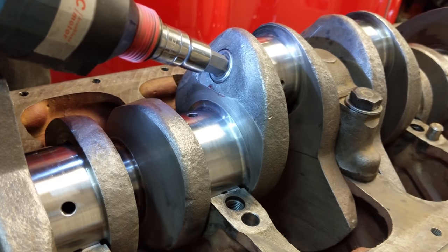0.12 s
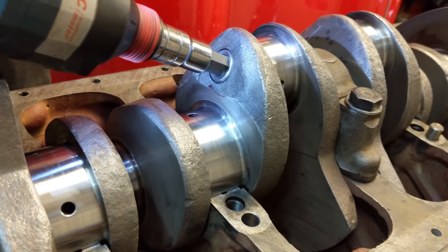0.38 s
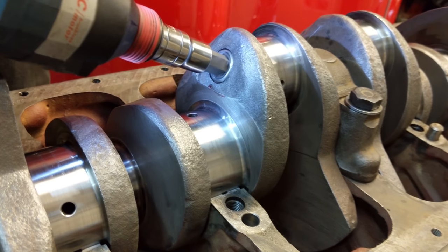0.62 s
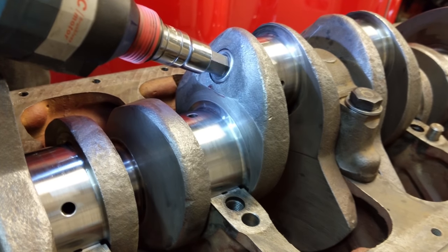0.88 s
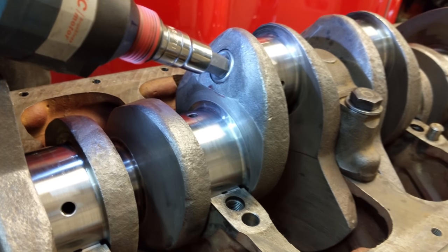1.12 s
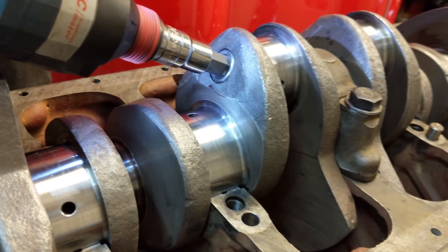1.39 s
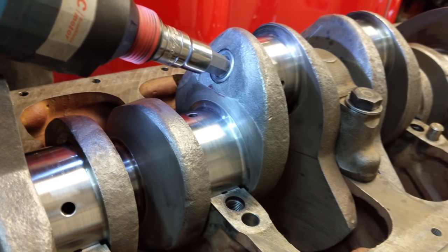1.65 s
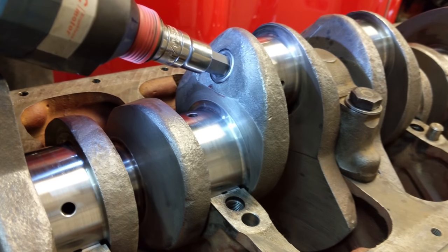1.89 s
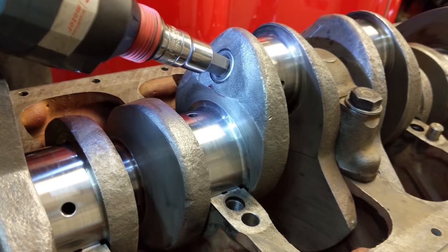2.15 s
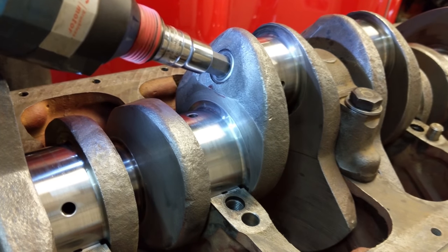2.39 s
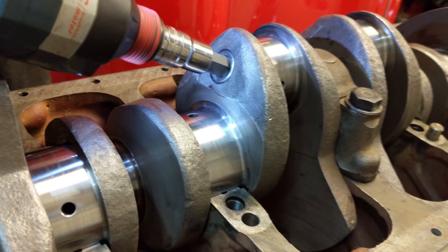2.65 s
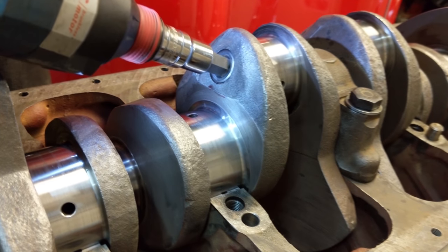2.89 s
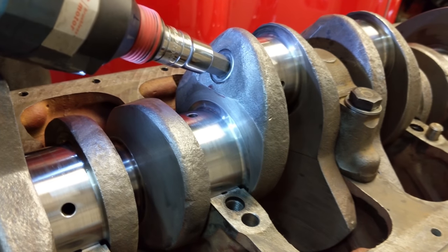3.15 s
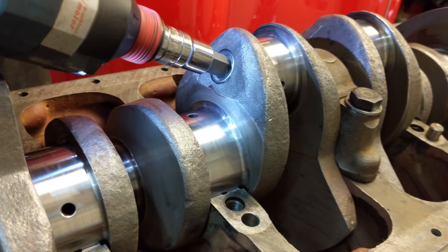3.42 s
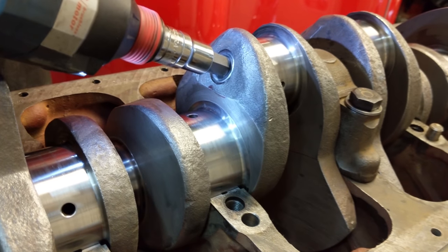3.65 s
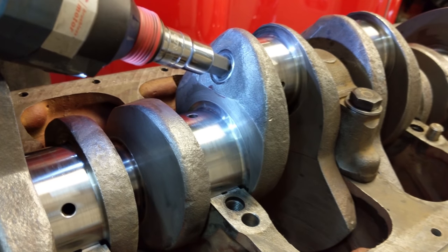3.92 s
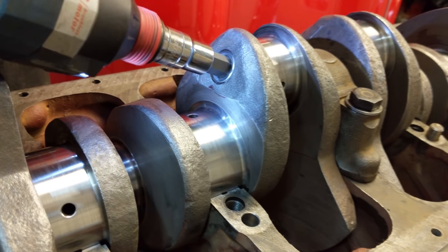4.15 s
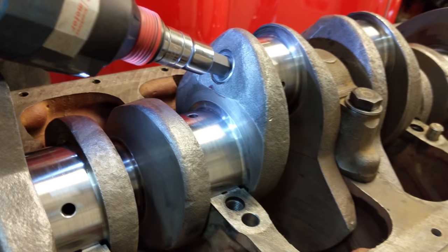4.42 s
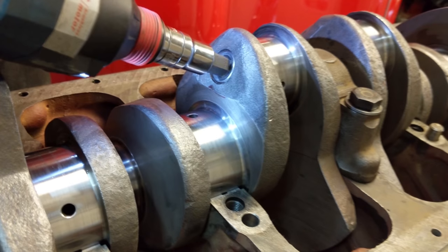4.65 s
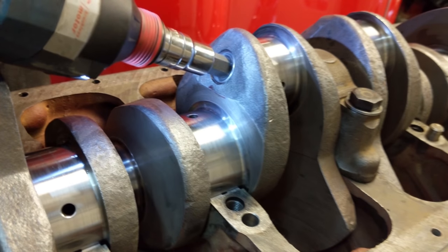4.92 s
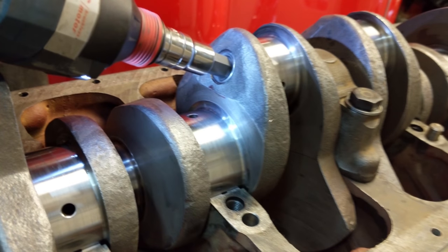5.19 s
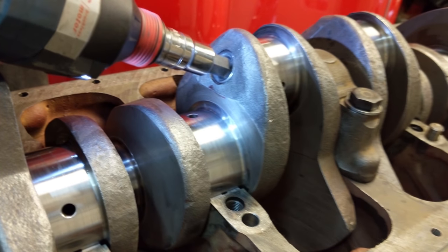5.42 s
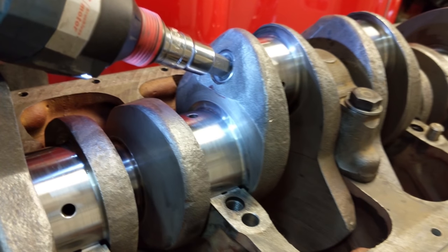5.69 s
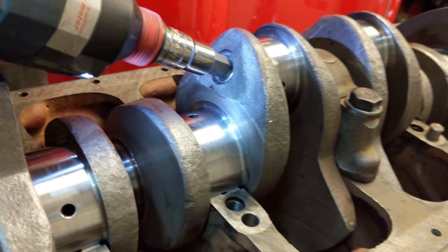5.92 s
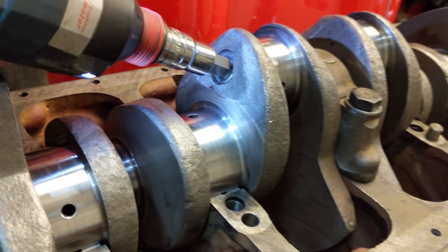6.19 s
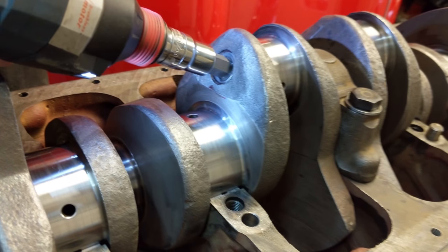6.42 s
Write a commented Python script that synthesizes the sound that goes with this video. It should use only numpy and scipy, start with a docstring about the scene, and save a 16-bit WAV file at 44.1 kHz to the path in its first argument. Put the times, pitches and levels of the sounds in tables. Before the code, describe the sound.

Fast, hard rattling of an impact tool against heavy metal, about twenty-seven blows a second, never pausing, with a thin high steel ring growing stronger.

```python
"""Impact driver on a crankshaft plug

An impact driver hammers a plug into a steel crankshaft, close by in a workshop.
Each cycle the hammer strikes the anvil, rebounds onto it some 8 ms later, rattles, and the cam ticks as it lifts.
Contacts are noise bursts; anvil, bit, shaft and housing are dying sines, many at new strengths on every blow.
Shaped noise whirrs underneath as motor and gears, and a short noise tail answers from the room."""
import sys
import numpy as np
from scipy import signal
from scipy.fft import rfft, irfft, next_fast_len
from scipy.io import wavfile
from scipy.ndimage import uniform_filter1d

SR = 44100
rng = np.random.default_rng(int(sys.argv[2]) if len(sys.argv) > 2 else 0)


def ratio_of_db(decibels):
    """Turn decibels (scalar or array-like) into linear amplitude factors; 0 dB maps to 1."""
    return 10 ** (np.asarray(decibels, float) / 20)


def persist_wave(psi):
    """Save psi, clipped to +-1, as 16-bit WAV."""
    counts = np.round(np.clip(psi, -1, 1) * 32767).astype(np.int16)
    wavfile.write(sys.argv[1], SR, np.atleast_2d(counts).T)


N = 289279
T = np.arange(SR // 10) / SR  # s, the time axis of one hit

# Levels in the tables are relative: each layer adds its own trim where it is played.


def unit(x):
    """Each row to rms 1."""
    return x / np.sqrt(np.mean(x ** 2, axis=-1, keepdims=True) + 1e-20)


def along(points, hz):
    """Read (Hz, value) points on a log frequency axis."""
    f, v = np.transpose(points)
    return np.interp(np.log(hz + 1), np.log(f + 1), v)


def read(table, s):
    """The columns of a curve table at times s."""
    when, *columns = np.transpose(table)
    return np.array([np.interp(s, when, column) for column in columns])


def filtered(x, response):
    """Rows of x times a response of frequency."""
    m = next_fast_len(x.shape[-1] + 2048)
    spectrum = rfft(x, m) * response(np.fft.rfftfreq(m, 1 / SR))
    return irfft(spectrum, m)[..., :x.shape[-1]]


def placed(seconds, rows):
    """Sum of the rows, each starting at its time."""
    start = np.round(np.asarray(seconds) * SR).astype(int)
    at = start[:, None] + np.arange(rows.shape[1])
    ok = (at >= 0) & (at < N)
    return np.bincount(at[ok], rows[ok], N)


def dying(t60, attack):
    """Envelope of a hit: exponential rise (time constant attack, s) and 60 dB decay in t60 s."""
    return ratio_of_db(-60 * T / t60) * (1 - np.exp(-T / attack))


def same_lug_blend(x):
    """Add the rows two and four hits back, so that hits on the same lug resemble each other."""
    return x + np.roll(x, 2, axis=0) + np.roll(x, 4, axis=0)


def nearest(s, moments):
    """Index of the event closest to each moment."""
    return np.abs(s[:, None] - moments).argmin(axis=0)


# decay of the workshop's answer: (frequency [Hz], t60 [s])
ROOM_DECAY = [(200, 0.44), (2000, 0.086), (10000, 0.046)]


def workshop(x):
    """Room answer 5 ms late: a noise tail in which each frequency dies at its own speed."""
    hz, t, z = signal.stft(rng.standard_normal(SR // 4), SR, nperseg=256)
    decay = ratio_of_db(-60 * t / along(ROOM_DECAY, hz)[:, None])
    tail = signal.istft(z * decay, SR, nperseg=256)[1]
    late = np.pad(x, (SR // 200, 0))
    return signal.fftconvolve(late, tail / np.linalg.norm(tail))[:N]


# colour of motor and gears: (frequency [Hz], level [dB per Hz, relative])
WHIRR_COLOUR = [(30, -27), (55, -9), (120, -1), (280, -9.5), (420, -16), (550, -2.5), (1200, -3.5),
                (1700, -3.5), (2450, -1.5), (2900, -0.5), (5000, -3), (8000, 0.5), (10000, -7),
                (12000, -29), (17000, -47)]


def motor():
    """Steady gear and fan noise, made slightly patchy in time and frequency."""
    z = signal.stft(rng.standard_normal(N + SR // 10), nperseg=256)[2]
    patches = uniform_filter1d(rng.standard_normal(z.shape), size=3, axis=0)
    patches = uniform_filter1d(patches, size=4, axis=1)
    patch_gain = ratio_of_db(2 * patches / patches.std())
    noise = signal.istft(z * patch_gain, nperseg=256)[1][:N]
    return ratio_of_db(-52.0) * unit(filtered(noise, lambda f: ratio_of_db(along(WHIRR_COLOUR, f))))


# colour of steel contacts: (frequency [Hz], level [dB, relative])
CONTACT_COLOUR = [(150, -15.5), (500, -15.5), (1500, -9.5), (3000, -5), (5500, -4), (8000, 3), (9600, 6),
                  (10300, -5.5), (12000, -7), (14200, -5), (15500, -8), (17000, -49)]


def cracks(db, t60, top_hz):
    """Noise bursts of steel contact, alike on the same lug; a lower top_hz makes them duller."""
    def colour(f):
        return ratio_of_db(along(CONTACT_COLOUR, f)) / (1 + (f / top_hz) ** 4)
    fresh = rng.standard_normal((len(db), len(T)))
    # many tiny contacts, not an even hiss
    flicker = uniform_filter1d(np.roll(fresh, 1, axis=0), size=30, axis=1)
    grit = ratio_of_db(3.1 * unit(flicker))
    burst = unit(filtered(same_lug_blend(fresh) * grit, colour))
    return ratio_of_db(db)[:, None] * burst * dying(t60, attack=0.00015)


# two housing modes that beat: (frequency [Hz], level [dB, relative], t60 [s])
HOUSING_MODES = [(1140, 3, 0.011), (1335, 1.5, 0.016)]


def knock():
    """The two housing modes start opposed, so the knock swells and then cancels itself."""
    out = 0
    for sign, (hz, db, t60) in zip((-1, 1), HOUSING_MODES):
        out = out + sign * ratio_of_db(db - 60 * T / t60) * np.cos(2 * np.pi * hz * T)
    return out


def housing(blow, rebound):
    """Body knocks at blow, rebound and cam lift; low dying sines kick it, sway it and push it again."""
    s, _, knock_db, kick_db, sway_db, _ = blow
    again = rebound[0]
    chance = rng.standard_normal((len(s), 3))
    hollow = np.sin(2 * np.pi * 660 * T) * dying(0.023, attack=0.0012)
    out = placed(s + 0.00031, ratio_of_db(knock_db + 5.5)[:, None] * knock() + ratio_of_db(-42.5) * hollow)

    hum = np.sin(2 * np.pi * 348 * T) * dying(0.044, attack=0.0015)
    hum_db = -59.5 + 1.3 * again  # hums more as the plug tightens
    out += placed(again, ratio_of_db(hum_db)[:, None] * hum)
    out += placed(again, ratio_of_db(-47.5 + 2 * chance[:, :1]) * knock())

    cam_knock = ratio_of_db(-51.5 + 2 * chance[:, 1:2]) * knock()
    cam_tick = cracks(-52 + 2 * chance[:, 1], t60=0.011, top_hz=3480)
    out += placed(s + .0293, cam_knock + cam_tick)

    kick = -np.sin(2 * np.pi * 360 * T) * dying(0.0069, attack=0.00032)
    out += placed(s - .0002, ratio_of_db(kick_db + 12)[:, None] * kick)
    out += placed(again, ratio_of_db(-41.5 + 4.0 * chance[:, 2:]) * kick)

    # a harder shove moves more of the hand and sways slower
    sway_hz = 94 - 4.2 * (sway_db[:, None] + 58)
    sway = np.cos(2 * np.pi * sway_hz * T) * dying(0.029, attack=0.00022)
    out += placed(s + 0.0014, ratio_of_db(sway_db + 10.0)[:, None] * sway)

    # the spring loads up to the rebound and lets go
    push = -np.sin(2 * np.pi * 105 * T) * dying(0.048, attack=0.0015)
    out += placed(again - .004, ratio_of_db(-59.0 + 2 * chance[:, 2:]) * push)
    return filtered(out, lambda f: 1 / (1 + (44 / (f + 1)) ** 6))  # rumble below 44 Hz is cut


# loose parts touching after a blow, before the bit colours them:
# (time after the blow [ms], level [dB against the rebound's steel])
RATTLE_TOUCHES = [(3.8, 0), (5.6, -2), (11, -4), (16, -38), (19.5, -30)]


def rattle(blow, rebound):
    """Loose parts touch at nearly the same moments of every cycle, coloured by the bit's resonance."""
    s, steel_db = blow[0], rebound[2]
    out = np.zeros(N)
    for ms, db in RATTLE_TOUCHES:
        chance = rng.standard_normal((len(s), 2))
        touch = cracks(steel_db + db + 1.9 * chance[:, 1], t60=0.0096, top_hz=11100)
        out += placed(s + (ms + 0.23 * chance[:, 0]) / 1000, touch)
    # light touches reach mainly the bit
    return filtered(out, lambda f: 0.53 + 1 / (1 + ((f - 8800) / 700) ** 2))


def shaft(rebound):
    """One mode lasts from blow to blow, topped up at each rebound mostly in step with what still rings."""
    shaft_hz, shaft_t60 = 8590, 0.13  # Hz, s
    again, _, _, lasting_db = rebound
    phase = np.cumsum(0.98 * rng.standard_normal(len(again)))[:, None]  # rad, wanders from hit to hit
    clock = np.round(again * SR)[:, None] / SR + T
    ring = np.sin(2 * np.pi * shaft_hz * clock + phase) * dying(shaft_t60, attack=.002)
    return placed(again, ratio_of_db(lasting_db + 6.0)[:, None] * ring)


# pitches of bit and shaft, one per mode: (frequency [Hz])
STEEL_PITCHES = [7620, 7950, 8350, 8560, 8815, 9010, 9170, 9510, 9630, 10830, 11070]
# quickly damped modes at those pitches: (level [dB, relative], t60 [s])
STEEL_MODES = [(-17, 0.043), (-13.5, 0.057), (-3.5, 0.014), (0, 0.018), (-4, 0.043), (-5.5, 0.033),
               (-7, 0.028), (-17, 0.06), (-32, 0.033), (-22, 0.053), (-11.5, 0.023)]


def rings(db, spread_db):
    """Steel modes at new strengths and phases for every contact, detuned a little by how the bit sits."""
    out = np.zeros((len(db), len(T)))
    for hz, (level_db, t60) in zip(STEEL_PITCHES, STEEL_MODES):
        size, detune, turn = rng.standard_normal((len(db), 3)).T[:, :, None]
        cycles = hz * (1 + 0.0024 * detune) * T + turn
        mode = np.sin(2 * np.pi * cycles) * dying(t60, attack=0.00011)
        out += ratio_of_db(level_db + spread_db * size) * mode
    early_rms = np.sqrt(np.mean(out[:, :SR // 170] ** 2, axis=1, keepdims=True))  # first 6 ms
    return ratio_of_db(db)[:, None] * out / early_rms


# anvil and socket modes: (frequency [Hz], level [dB, relative], t60 [s])
ANVIL_MODES = [(1753, -19.5, .014), (2130, -16.5, 0.0093), (2440, -28, 0.047), (3660, -11, 0.0072),
               (4680, -8.5, 0.0072), (5306, 0.5, 0.0048), (5940, -0.5, 0.0064), (6680, -4, 0.011),
               (7420, -2.5, 0.01), (13900, -17, 0.011), (14900, -21, .012)]
# the bit shifts in its seat, which changes what the anvil rings with:
# (time [s], low modes [dB, relative], middle modes [dB, relative], upper modes [dB, relative])
SEAT_SHIFTS = [(0, 3.5, 7, -0.5), (.6, 1.5, 1.5, 0), (1.2, 6, 4.5, -15), (1.8, 4, 0, 0.5),
               (2.4, 3.5, 4, -2), (3, 9, 7, 1.5), (3.6, 4.5, 4, -3.5), (4.2, 8, 1.5, 3.5),
               (4.8, 8.5, 2, -1), (5.4, 4, 5, -7), (6, 9, 4.5, -4), (6.56, 4.5, -2, 2)]


def anvil(s, db, drift_db, slip):
    """Anvil modes whose strength (dB) and phase (slip, rad) drift over a few turns, apart for each lug."""
    seat_db = read(SEAT_SHIFTS, s)
    out = 0
    for hz, level_db, t60 in ANVIL_MODES:
        drift, turn = unit(same_lug_blend(rng.standard_normal((len(s), 2))).T)
        group = np.searchsorted([4000, 5600], hz)  # low, middle or upper modes
        size = ratio_of_db(db + level_db + seat_db[group] + drift_db * drift)[:, None]
        tone = np.sin(2 * np.pi * hz * T + slip * turn[:, None])
        out = out + size * tone * dying(t60, attack=.0001)
    return out


def hammer(blow, rebound):
    """Blow and rebound crack on the anvil, leave a clatter and ring the steel."""
    s, crack_db, _, _, _, steel_db = blow
    again, crack2_db, steel2_db, _ = rebound
    hit = anvil(s, crack_db + 1, drift_db=2.5, slip=0.79)
    hit = hit + cracks(crack_db + 4.5, t60=0.0051, top_hz=16000)
    clatter = cracks(crack_db - 3.0, t60=0.042, top_hz=10000)
    out = placed(s, hit + clatter + rings(steel_db - 1, spread_db=4.5))

    hit = anvil(again, crack2_db + 5, drift_db=4.0, slip=1.18)
    hit = hit + cracks(crack2_db + 11.0, t60=0.0082, top_hz=16000)
    clatter = cracks(crack2_db - 3.0, t60=0.049, top_hz=10600)
    out += placed(again + .0003, hit + clatter + rings(steel2_db - 4, spread_db=1.5))

    # a faint dull noise leads into each blow, 1.6 ms early
    out += placed(s - .0016, cracks(crack_db - 11, t60=0.028, top_hz=11900))
    return out


# how firmly the plug holds the bit, for blows and rebounds: (time [s], rebound crack [dB, relative],
# rebound steel [dB, relative], lasting ring [dB, relative], sway of the tool [dB, relative])
PLUG_GRIP = [(0, -39, -40, -49.5, -56.5), (.9, -36.5, -37.5, -48, -57.5), (1.4, -36.5, -37, -49, -65),
             (2.35, -40.5, -35.5, -52, -56), (2.7, -39, -32, -45.5, -56), (3.2, -42.5, -28, -44, -57),
             (4.1, -40.5, -30, -48, -56), (5, -39.5, -31.5, -44.5, -58.5), (5.6, -38.5, -32.5, -47, -60.5),
             (6.56, -39, -29.5, -44.5, -56)]
# pace of the hammer, even between these blows, a little slower as the plug tightens: (blow number, time [s])
HAMMER_PACE = [(0, .0058), (12, .4526), (23, .862), (34, 1.271), (42, 1.5689), (53, 1.9798), (68, 2.539),
               (79, 2.9488), (86, 3.2094), (97, 3.6199), (105, 3.9198), (113, 4.219), (117, 4.3682),
               (134, 5.0042), (146, 5.4545), (158, 5.905), (168, 6.2801), (175, 6.5422)]
# the anvil's two lugs are hit in turn and share the load unevenly: (time [s], crack first lug [dB, relative],
# crack second lug [dB, relative], knock first lug [dB, relative], knock second lug [dB, relative])
LUG_LOADS = [(0, -27.5, -27.5, -43, -42.5), (.4, -29, -30.5, -42.5, -42.5), (.75, -29.5, -27.5, -41.5, -45),
             (.9, -29, -24.5, -46, -53), (1.1, -36, -27, -47, -40.5), (1.22, -33, -27, -53, -46),
             (1.45, -31, -27, -40.5, -44.5), (1.68, -33, -27, -49, -44.5), (1.8, -26.5, -27, -40.5, -48),
             (2.2, -29, -29, -45.5, -39), (2.75, -28, -30, -44.5, -45), (3.15, -29.5, -36.5, -45, -41),
             (3.3, -28.5, -30.5, -41, -40), (3.8, -28, -30.5, -44, -43.5), (4.3, -31, -31.5, -42, -42),
             (4.8, -32, -28.5, -45, -43), (5.1, -30, -26.5, -41.5, -43), (5.7, -34.5, -28, -41, -49),
             (6.15, -33, -29, -42, -49), (6.56, -30, -28.5, -52, -47)]
# blows that jolt the whole tool: (time [s], kick [dB, relative], sway [dB, relative])
TOOL_JOLTS = [(.006, -44, -57), (.453, -45, -57), (.49, -50, -63), (.527, -56, -45), (.75, -47, -49),
              (.825, -46, -48.5), (.974, -47, -48), (1.16, -57, -64), (1.271, -46, -51), (1.42, -43, -50),
              (1.457, -53, -49), (1.606, -47, -52), (1.643, -46, -60), (2.054, -45, -51), (2.092, -46, -56),
              (2.129, -47, -54), (2.204, -49, -54), (2.241, -46.5, -58), (2.315, -45, -50),
              (2.427, -45, -52), (2.502, -42.5, -52), (2.576, -47, -52), (2.614, -47, -44),
              (2.651, -41, -54), (2.874, -47, -52), (2.912, -48, -50), (3.023, -45, -50), (3.098, -47, -51),
              (3.172, -47, -55), (3.322, -52, -51), (3.359, -42, -55), (3.545, -44, -56), (3.92, -43, -55),
              (3.995, -45, -56), (4.07, -45, -52), (4.144, -42.5, -53), (4.219, -49, -51),
              (4.294, -46, -52), (4.406, -48, -49), (4.555, -45, -52), (4.593, -44, -56), (4.667, -41, -56),
              (4.742, -49, -52), (4.929, -45, -52), (5.117, -44, -61), (5.154, -43.5, -52),
              (5.304, -51, -62), (5.342, -44, -59), (5.867, -46, -50), (6.017, -44, -52), (6.168, -47, -57),
              (6.242, -48.5, -70), (6.43, -45, -56), (6.542, -47, -55)]
# random spread of a blow, one entry each for crack, knock, kick, sway, steel: (spread [dB])
BLOW_SPREAD = [0.55, 1.3, 5.4, 4.2, 2.3]


def blows():
    """Time and strengths of every blow: s, crack, knock, kick, sway, steel dB."""
    jitter_s = .0001
    usual_kick_db, usual_steel_db = -56.5, -36
    number, when = np.transpose(HAMMER_PACE)
    n = np.arange(number[-1] + 1)
    chance = rng.standard_normal((len(n), 6)).T
    s = np.interp(n, number, when) + jitter_s * chance[5]
    crack, knocking, kick, sway, steel = chance[:5] * np.c_[BLOW_SPREAD]

    crack_a, crack_b, knock_a, knock_b = read(LUG_LOADS, s)
    crack_db = np.where(n % 2, crack_b, crack_a) + crack
    knock_db = np.where(n % 2, knock_b, knock_a) + knocking

    # the upward scatter of ordinary kicks and sways is capped
    kick_db = usual_kick_db + np.minimum(kick, 6)
    sway_db = read(PLUG_GRIP, s)[3] + np.minimum(sway, 4)
    at, jolt_kick_db, jolt_sway_db = np.transpose(TOOL_JOLTS)
    jolted = nearest(s, at)
    kick_db[jolted], sway_db[jolted] = jolt_kick_db, jolt_sway_db

    # a harder kick rings the steel more, 0.32 dB per dB
    steel_db = usual_steel_db + 0.32 * (kick_db - usual_kick_db) + steel
    return s, crack_db, knock_db, kick_db, sway_db, steel_db


# rebounds with a loud steel ping or a strong lasting ring:
# (time [s], steel [dB, relative], lasting ring [dB, relative])
RINGING_REBOUNDS = [(.052, -33, -37), (.089, -33, -42), (2.0255, -28.5, -44), (2.547, -33, -35.5),
                    (2.621, -36, -37.5), (2.696, -36, -36), (3.181, -28, -43), (3.366, -24.5, -38),
                    (3.404, -29.5, -38), (3.891, -30, -39), (3.965, -27.5, -36), (4.04, -26.5, -41),
                    (4.34, -28, -43), (4.674, -28, -45), (4.937, -25, -40), (5.05, -26.5, -35),
                    (5.349, -31, -40), (5.387, -28, -37), (5.688, -24.5, -41), (5.725, -25.5, -38),
                    (5.95, -29, -41), (6.139, -28, -41), (6.176, -28, -38), (6.251, -32, -39),
                    (6.288, -29.5, -37), (6.438, -28.5, -34)]
# random spread of a rebound, one entry each for crack, steel, lasting ring: (spread [dB])
REBOUND_SPREAD = [2, 2, 3]


def rebounds(s):
    """One rebound after each blow: s, crack, steel, lasting ring dB."""
    delay_s, scatter_s = .0083, .00055
    chance = rng.standard_normal((len(s), 4)).T
    again = s + delay_s + scatter_s * chance[3]
    crack_db, steel_db, lasting_db = read(PLUG_GRIP, s)[:3] + chance[:3] * np.c_[REBOUND_SPREAD]
    pings = np.transpose(RINGING_REBOUNDS)
    ringing = nearest(again, pings[0])
    again[ringing], steel_db[ringing], lasting_db[ringing] = pings
    return again, crack_db, steel_db, lasting_db


def scene():
    """Tool close by, room behind it, motor underneath."""
    blow = blows()
    rebound = rebounds(blow[0])
    tool = housing(blow, rebound) + rattle(blow, rebound) + shaft(rebound) + hammer(blow, rebound)
    room = ratio_of_db(-22.0) * workshop(tool)
    return (room + motor() + tool)[None]


def low_pass(x):
    """Removes everything above the highest recorded frequency."""
    return signal.sosfilt(signal.butter(12, 16640, fs=SR, output="sos"), x)


def record(dry):
    """The camera's input squeezes the loudest peaks below a ceiling, then the top is cut."""
    ceiling, top_hz = .125, 15850  # full scale is 1; Hz
    squeezed = dry / (1 + np.abs(dry / ceiling) ** 5) ** (1 / 5)
    mix = filtered(squeezed, lambda f: 1 / (1 + (f / top_hz) ** 60))
    return low_pass(mix)


dry = scene()
out = record(dry)
persist_wave(out)
```